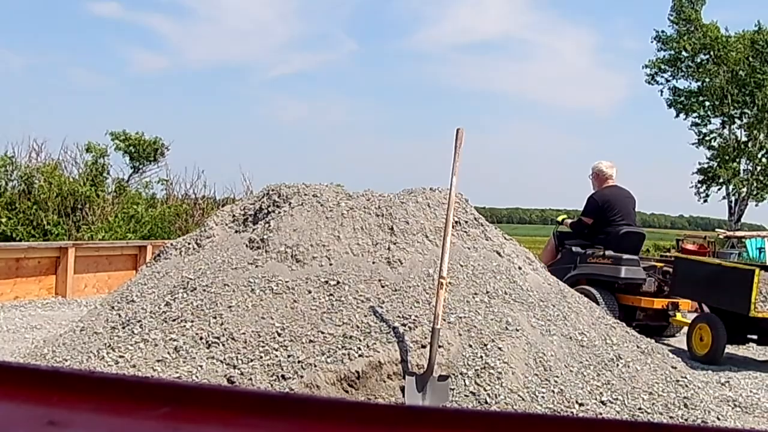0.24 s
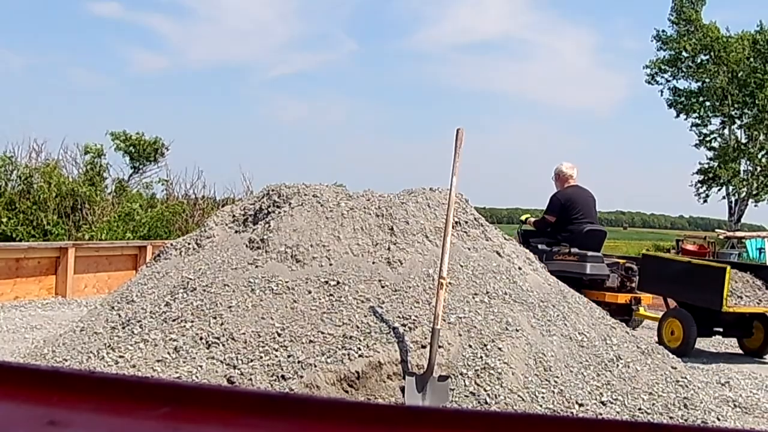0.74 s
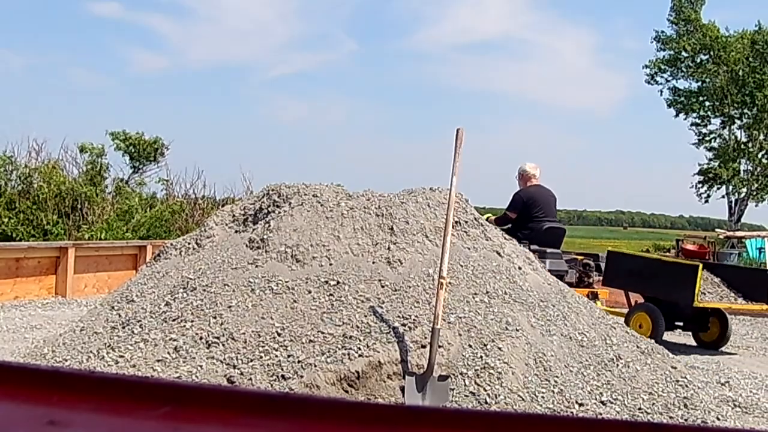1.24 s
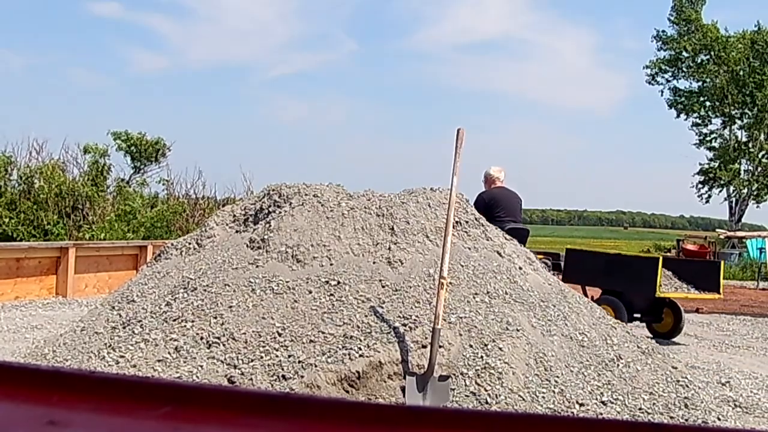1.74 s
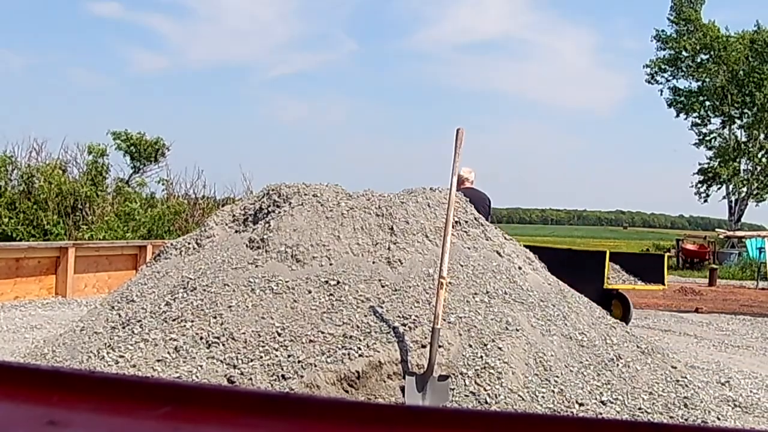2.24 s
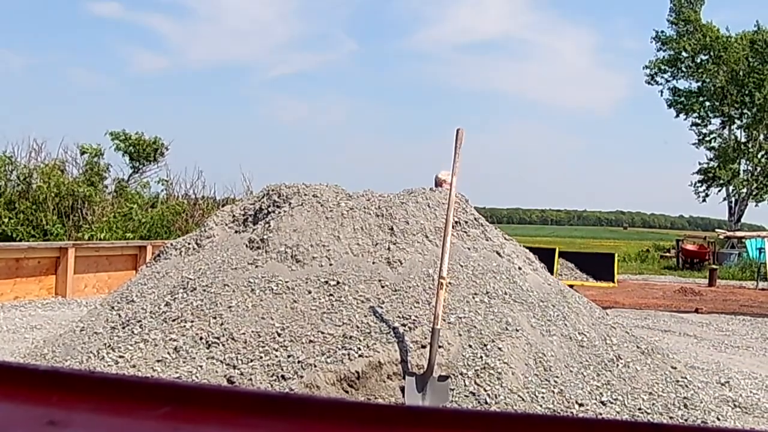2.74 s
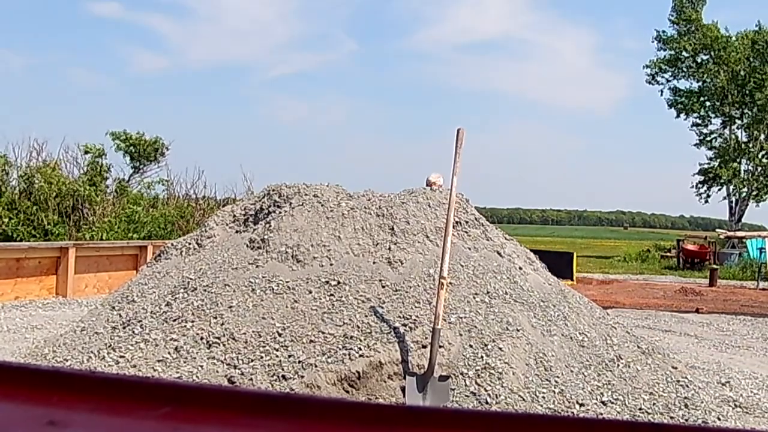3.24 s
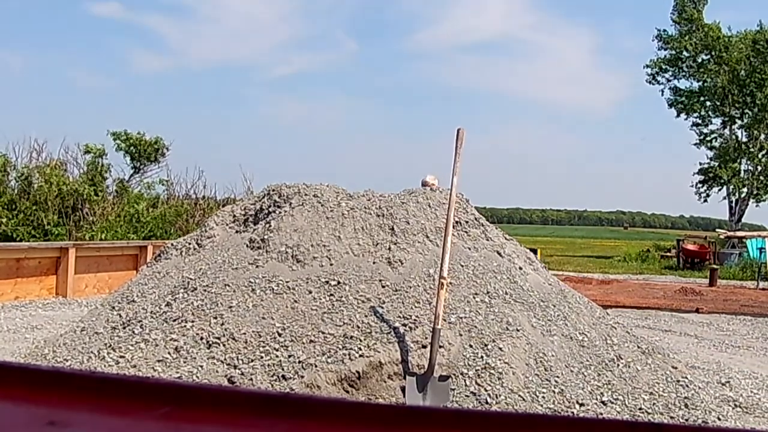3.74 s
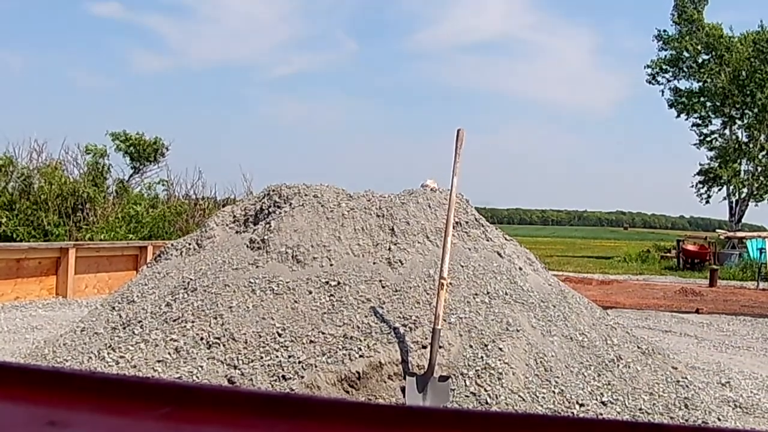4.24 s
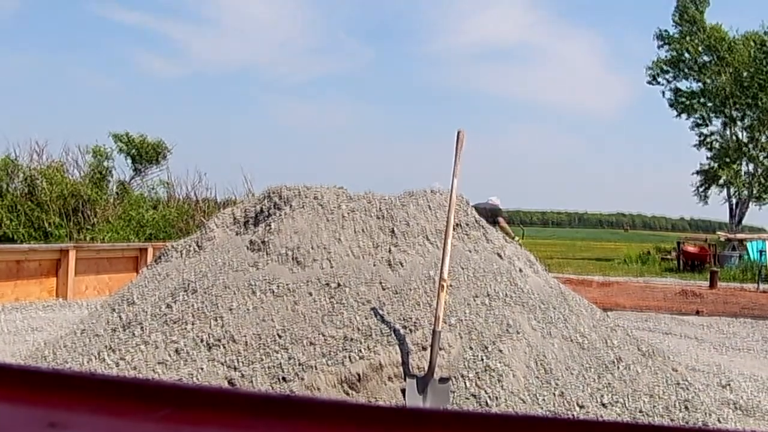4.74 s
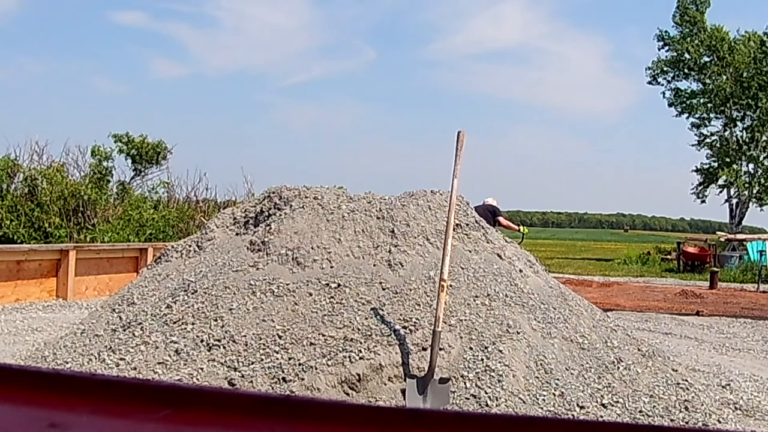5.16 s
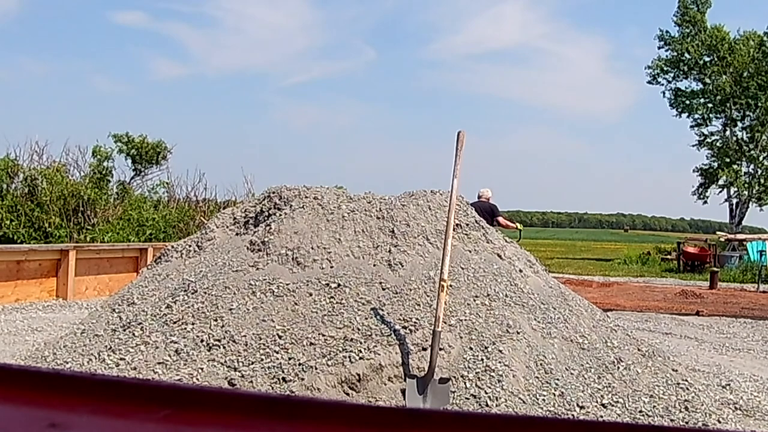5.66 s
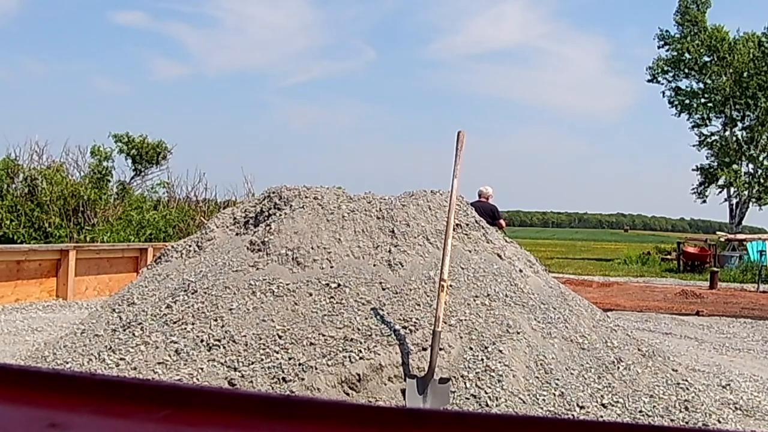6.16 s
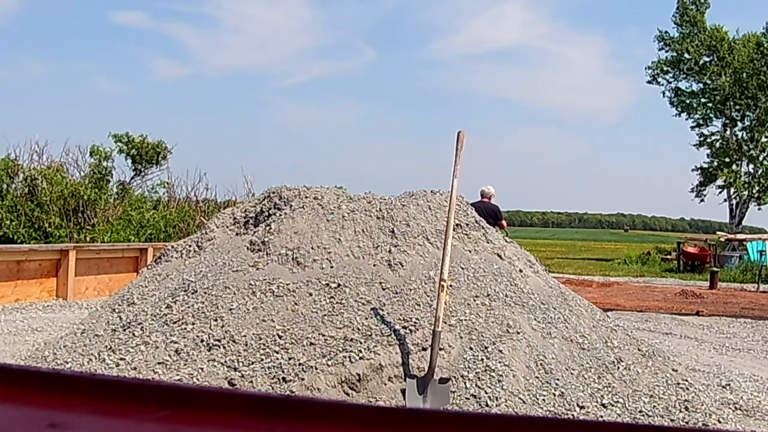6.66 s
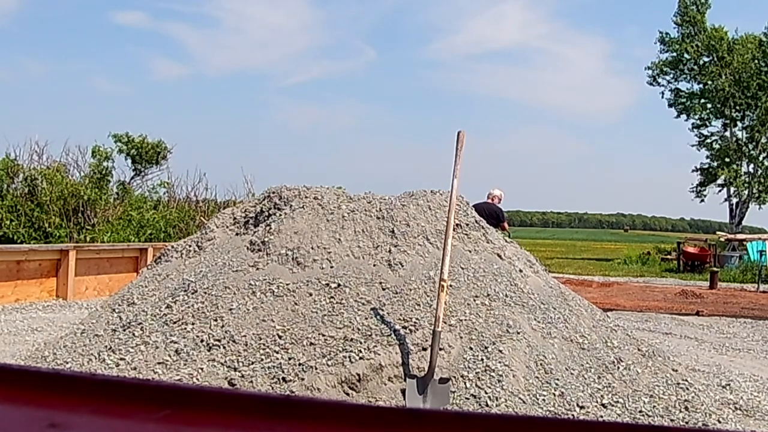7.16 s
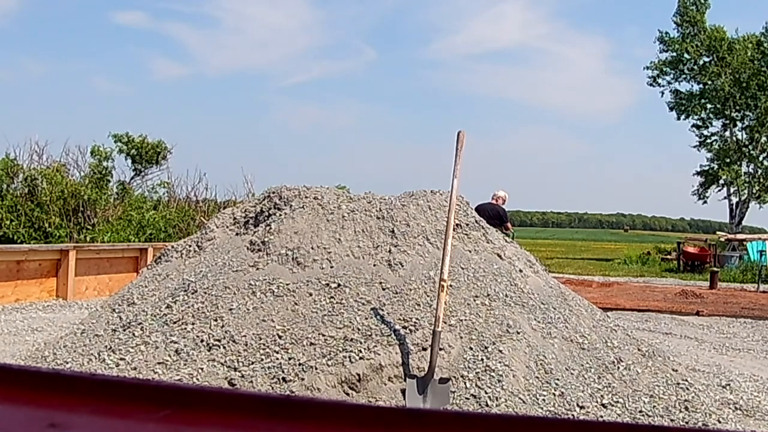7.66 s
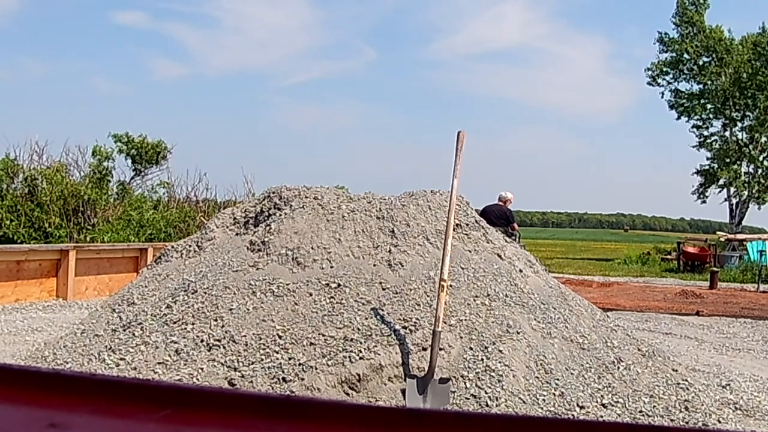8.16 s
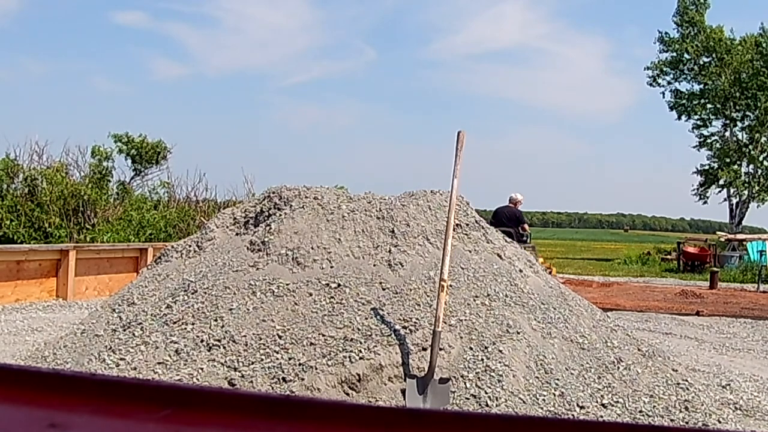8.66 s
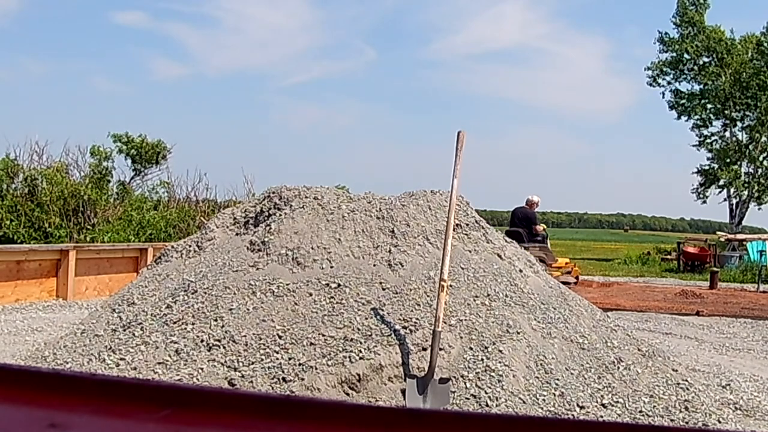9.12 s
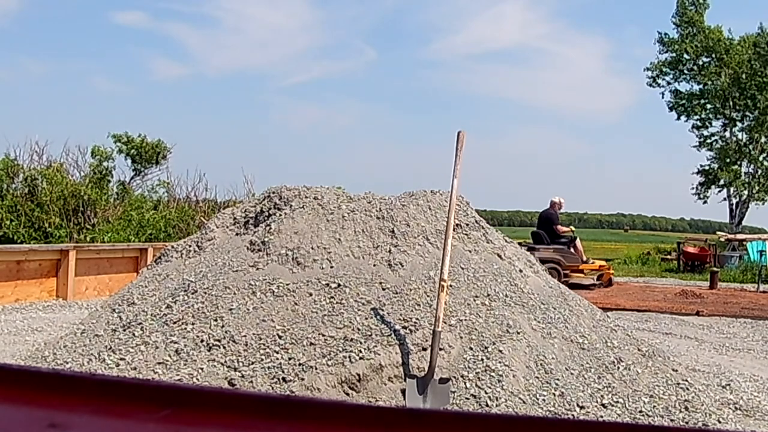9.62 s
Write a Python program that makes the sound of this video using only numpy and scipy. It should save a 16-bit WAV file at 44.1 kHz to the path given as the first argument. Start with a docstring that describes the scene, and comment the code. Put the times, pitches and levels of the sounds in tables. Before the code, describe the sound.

A ride-on mower with an uneven two-cylinder engine throbs near the microphone outdoors, low thumps with bark, clatter and thin mechanical whirr. It becomes duller as it goes behind a gravel heap, wind bumping the microphone. Just before the middle it quickly fades to a farther, clearly quieter chug, hollow and steady, sinking further at the end.

```python
"""A ride-on mower with an uneven-firing two-cylinder engine drives behind a gravel heap, outdoors.
Each firing thumps ringing muffler modes, with a moving echo, and sets off puffs of noise for knock, bark and hiss.
Tones locked to the crank whirr on top; gravel clicks, rolling noise, air hiss and wind rumble lie beneath.
A near pass crossfades into a farther, quieter one. Levels in dB stand ahead of the recorder's gain."""
import sys
import numpy as np
from scipy import signal
from scipy.io import wavfile
from scipy.ndimage import uniform_filter1d

SR = 44100
rng = np.random.default_rng(int(sys.argv[2]) if len(sys.argv) > 2 else 0)


def amplitude_ratio(level_db):
    """Convert a level in decibels to the matching linear amplitude (field) ratio."""
    exponent = np.asarray(level_db, float) / 20
    return 10 ** exponent


def inscribe(sig):
    """Save sig as 16-bit PCM at rate SR to the path in sys.argv[1].

    A 1-D sig is mono; a 2-D sig holds one channel per row.
    Samples are clipped to [-1, 1] before scaling.
    """
    pcm = np.round(np.clip(np.atleast_2d(sig).T, -1, 1) * 32767)
    wavfile.write(sys.argv[1], SR, pcm.astype(np.int16))


N = 436149
TIME = np.arange(N) / SR  # seconds


def rms_one(x):
    """Scale to rms 1."""
    return x / np.sqrt(np.mean(x ** 2) + 1e-20)


def evened(x):
    """Scale to rms 1 over every few engine cycles."""
    power = uniform_filter1d(uniform_filter1d(x ** 2, size=SR // 4), size=SR // 4)
    return x / np.sqrt(power + 1e-20)


def in_time(rows, s):
    """The columns of a table read at times s."""
    times, *columns = np.transpose(rows)
    return [np.interp(s, times, c) for c in columns]


def near_to_far(s, near, far):
    """A setting at times s that glides from its near to its far value during the crossfade."""
    return np.interp(s, (4.6, 5.0), (near, far))


def turning_away(db):
    """Gain that sinks by db as the muffler swings behind the engine."""
    return amplitude_ratio(np.interp(TIME, (6.45, 9.3), (0, db)))


def clicks(s, size):
    """Impulses at times s."""
    at = np.round(s * SR).astype(int)
    heard = (at >= 0) & (at < N)
    return np.bincount(at[heard], size[heard], N) + 1e-18


def ring(x, hz, t60):
    """Damped resonator: a unit click sets a sine of height 1 ringing."""
    r, w = amplitude_ratio(-60 / (t60 * SR)), 2 * np.pi * hz / SR
    return signal.lfilter([0, np.sin(w)], [1, -2 * r * np.cos(w), r * r], x)


def band(x, low_hz, high_hz, order=2):
    """Band-pass."""
    return signal.sosfilt(signal.butter(order, [low_hz, high_hz], "band", fs=SR, output="sos"), x)


def drift(rate_hz):
    """Slow chance of spread 1: low-passed noise drawn at every 40th sample."""
    r = np.exp(-80 * np.pi * rate_hz / SR)
    slow = signal.lfilter([1], [1, -2 * r, r * r], rng.standard_normal(N // 40 + 2002))[2000:]
    return np.interp(np.arange(N) / 40, np.arange(len(slow)), rms_one(slow))


def nearest(when, strength, s):
    """Index of the firing nearest to s, passing over those of the faded pass."""
    return np.argmin(abs(when - s) + (strength < .5))


# Where the mower is, as heard from the microphone. Each row: time in seconds, exhaust level in dB,
# share in the open (0-1), engine side toward us (0-1), tail pipe toward us (0-1).
MOWER_PATH = [(0, -22.5, 0.91, 0.93, 0.84), (.7, -23.5, 1, 0.84, 0.69), (1.44, -25, 0.99, 0.63, 0.2),
              (1.8, -25, 0.93, 0.54, 0.85), (2.3, -25, 0.43, 0.67, 0.86), (2.6, -26.5, 0.23, 0.68, 0.6),
              (2.9, -27, 0.45, 1, 0.12), (3.24, -24.5, 0.43, 1, 0.63), (3.6, -22.5, 0.24, 1, 0.77),
              (4.3, -24.5, 0, 0.72, 0.76), (4.6, -26, 0.02, 0.62, 0.82), (5.0, -34.5, 0.18, 0.33, 0.5),
              (5.6, -33.5, 0.29, 0.44, 0), (7.6, -34, 0.14, 0.52, 0), (8.6, -35, 0.12, 0.23, 0.75),
              (9.1, -34.5, 0.33, 0.5, 0.55), (9.6, -37.5, 0, 0.27, 0.1), (9.89, -39.5, 0.56, 0.26, 0.24)]


def mower_at(s):
    """Exhaust level in dB, openness, engine side and tail pipe at times s."""
    return in_time(MOWER_PATH, s)


# Engine speed under the governor, close by and farther off.
# Each row: time in seconds, speed in cycles per second; each cycle fires both cylinders.
NEAR_ENGINE_SPEED = [(0.0, 18.036), (0.2, 18.475), (0.7, 18.298), (1.05, 18.655), (1.45, 17.5),
                     (1.6, 17.601), (2.0, 19.222), (2.7, 18.019), (2.8, 17.605), (3.1, 17.732),
                     (3.5, 18.69), (4.0, 18.602), (4.3, 18.04), (4.85, 17.887), (5.0, 18.655)]
FAR_ENGINE_SPEED = [(4.4, 17.989), (5.15, 18.091), (5.35, 17.722), (6.1, 18.448), (6.4, 18.069),
                    (8.05, 17.76), (8.3, 18.95), (8.45, 18.579), (8.6, 17.958), (8.95, 17.071),
                    (9.35, 19.073), (9.9, 18.981)]


def crank():
    """For the near and the far pass: times, and the cycles turned by then (the integral of speed)."""
    passes = []
    for speed, start_cycle in ((NEAR_ENGINE_SPEED, .267), (FAR_ENGINE_SPEED, .954)):
        s = np.arange(speed[0][0], speed[-1][0], 1 / 1000)
        passes.append((s, start_cycle + np.cumsum(in_time(speed, s)[0]) / 1000))
    return passes


# Weak firings. Each row: time in seconds, change of strength in dB.
WEAK_FIRINGS = [(2.82, -14.5), (4.465, -5), (5.23, -6.5), (5.31, -5.5), (6.01, -2.5), (6.228, -1.5),
                (6.559, -1.5), (6.892, -2.5), (7.731, -1), (7.843, -1)]


def firings():
    """Times, cylinder (0 or 1) and strength of all firings; the cylinders are unevenly spaced."""
    second_cylinder = .375  # part of a cycle after the first
    rows = []
    for is_far, (s, cycles) in enumerate(crank()):
        for second in (0, 1):
            due = np.arange(int(cycles[-1]) + 1 - second) + second * second_cylinder
            when = np.interp(due, cycles, s, s[0] - 1)
            share = near_to_far(when, 1 - is_far, is_far)
            rows += list(zip(when, np.full(len(due), second), np.sqrt(share)))
    when, second, strength = np.transpose(rows)
    for s, weak_db in WEAK_FIRINGS:
        strength[nearest(when, strength, s)] *= amplitude_ratio(weak_db)
    return when, second, strength


def air():
    """Broad hiss: white noise whose level flickers."""
    return amplitude_ratio(near_to_far(TIME, -75, -83)) * rng.standard_normal(N) * amplitude_ratio(2.5 * drift(9))


# Gusts on the microphone port. Each row: time of the peak in seconds, peak level in dB.
WIND_GUSTS = [(.37, -37), (.71, -52), (1.18, -61), (1.479, -37.5), (1.79, -52), (2.079, -37), (2.6, -33),
              (2.75, -35), (2.93, -43), (3.451, -63), (3.58, -46), (3.97, -42), (4.1, -57.5), (4.381, -50),
              (4.7, -44), (5.32, -47)]


def wind():
    """Lumpy low rumble on the microphone port: a breeze with short bell-shaped gusts."""
    gust_s = 0.065  # spread of a gust
    gusts = sum(amplitude_ratio(db) * np.exp(-((TIME - at) / gust_s) ** 2 / 2) for at, db in WIND_GUSTS)
    rumble = band(rng.standard_normal(N), 24, 150)
    breeze = amplitude_ratio(near_to_far(TIME, -48, -55))
    return (breeze + gusts) * rms_one(rumble * amplitude_ratio(1.4 * drift(12.0)))


# Driving off again at a distance. Each row: time in seconds, level of the wash in dB.
DRIVING_OFF = [(8.5, -85), (9.0, -83.5), (9.4, -66), (9.89, -76)]


def rolling():
    """Driving off: a smooth noise wash of tyres and drive with one deck resonance in it."""
    noise = rng.standard_normal(N)
    wash = rms_one(band(noise, 560, 1700))
    deck = amplitude_ratio(-4) * rms_one(ring(noise, 1255, .05))
    return amplitude_ratio(in_time(DRIVING_OFF, TIME)[0]) * (wash + deck)


def gravel_roar():
    """Dense clicks of stones shifting under the tyres fill the gaps; the heap hides them far off."""
    stones_per_s, spread_db = 1500, 3.5
    sizes = amplitude_ratio(spread_db * np.minimum(rng.exponential(1, N), 5)) * rng.choice([-1, 1], N)
    stones = sizes * (rng.random(N) < stones_per_s / SR)
    crunch = evened(band(stones, 650, 1005)) * amplitude_ratio(2.0 * drift(6.0))
    return amplitude_ratio(near_to_far(TIME, 0, -7)) * crunch


# Shake, fan and pump tones. Each row: turns per engine cycle, level in dB to the exhaust level,
# dB gained in the open, dB gained far off.
WHIRR_TONES = [("2", -29.5, 1.9, -7.5), ("15", -28, 3.2, 3.8), ("16", -31, 0.99, -3), ("17", -34, 1.5, -6),
               ("18", -32.5, 2.3, 10.3), ("20", -32, 0.81, -18), ("21", -42, 1.1, -2.7),
               ("22", -27, -9.5, 4.7), ("23", -41, 13, 0.6), ("26", -37, 5.1, -1), ("28", -46.5, 1.1, 1.1),
               ("29", -41.5, 0.56, 15.1), ("32", -38.5, 2.4, 1.1), ("38", -45, 2.1, 1.4)]
# A tone swells for a while as a panel picks it up, or sinks where the dB are negative.
# Each row: time of the middle in seconds, half length (to 1/e) in seconds, tone per engine cycle, change in dB.
TONE_SWELLS = [(0.41, 0.74, "29", 15), (0.78, 0.46, "20", 6), (0.971, 0.56, "18", 0.5),
               (2.145, 0.12, "20", 12), (2.162, .21, "26", 11), (3.067, 0.21, "29", 17.4),
               (3.216, 0.28, "23", 13.5), (3.314, 0.26, "21", 11), (3.32, .39, "26", 2),
               (3.405, 1.1, "20", 6), (3.93, 0.18, "32", 20), (3.96, 0.24, "18", -3.5),
               (3.98, 0.36, "16", 13.5), (3.99, .45, "17", 11), (0.3, .5, "15", 6), (3.898, .4, "38", 10.5),
               (4.862, 0.47, "22", 5), (7.908, 1.9, "22", 2.4), (8.155, 0.15, "21", 8.1),
               (8.316, 0.27, "22", -10), (8.34, 0.079, "29", -9), (8.36, 0.16, "32", 11),
               (8.368, .11, "26", 14), (9.105, 0.99, "18", -23), (9.12, 0.43, "15", -9.5),
               (9.21, 0.23, "32", 7.1), (9.558, 0.26, "28", 13), (9.614, 0.3, "29", -11.1),
               (9.62, 0.44, "26", 16), (9.63, 0.3, "22", -13)]


def whirr():
    """Sines locked to the crank, wavering in level and throbbing once a cycle."""
    throb_depth, throb_peak = .25, .2  # peak as part of the cycle
    far = near_to_far(TIME, 0, 1)
    level_db, in_open = mower_at(TIME)[:2]
    near_cycles, far_cycles = (np.interp(TIME, s, cycles) for s, cycles in crank())
    out = 0
    for order, db, open_db, far_db in WHIRR_TONES:
        near_tone = np.sin(2 * np.pi * int(order) * near_cycles)
        far_tone = np.sin(2 * np.pi * int(order) * far_cycles)
        tone = (1 - far) * near_tone + far * far_tone
        swell_db = sum(lift * np.exp(-((TIME - at) / length) ** 2)
                       for at, length, which, lift in TONE_SWELLS if which == order)
        tone_db = level_db + db + open_db * in_open + far_db * far + swell_db + 1.8 * drift(4.0)
        out = out + np.sqrt(2) * tone * amplitude_ratio(tone_db)
    cycles = np.where(far < .5, near_cycles, far_cycles)
    return out * (1 + throb_depth * np.cos(2 * np.pi * (cycles - throb_peak)))


# Engine shroud and deck resonances.
# Each row: frequency in Hz, nominal width in Hz, level in dB against the other modes of its band.
BODY_MODES = [(751.5, 36, 6.5), (915, 63, -1), (1253, 13, -5), (1464, 160, 0.5), (1625, 150, -1),
              (2042, 41, -7), (2197, 120, -5), (2420, 160, -4), (2712, 57, -11), (3917, 200, -2.5),
              (4260, 320, -0.5), (4520, 210, -6), (5580, 530, 4), (6110, 150, -8), (6340, 300, -4.5),
              (6790, 89, -5.5), (9100, 110, -24), (9700, 58, -11), (9900, 92, -4), (10600, 94, -13)]


def puffs(when, size, edges_hz, t60, steady_db, crack_db, broad_db, vary_db):
    """A crack and a dying gas puff per firing over steady rattle excite each body mode, plus a broad part."""
    fade, noise = amplitude_ratio(-60 / (t60 * SR)), rng.standard_normal(N)
    scale = np.sqrt(SR / 36 * (1 - fade ** 2))  # puffs of about unit power

    def gas(sizes):
        """Excitation for one set of firing strengths."""
        gate = clicks(when, sizes)
        swell = scale * signal.lfilter([1], [1, -fade], gate)
        rattle = amplitude_ratio(steady_db + 3.0 * drift(15))
        return (swell + rattle) * noise + amplitude_ratio(crack_db + 30) * gate

    out = amplitude_ratio(broad_db) * rms_one(band(gas(size), *edges_hz))
    for hz, width_hz, db in BODY_MODES:
        if edges_hz[0] < hz < edges_hz[1]:
            struck = gas(size * amplitude_ratio(vary_db * rng.standard_normal(len(when))))  # each mode hit anew
            mode = ring(struck, hz, 2.6 / width_hz)
            out += amplitude_ratio(db) * rms_one(band(mode, *edges_hz, order=1))
    return evened(out)


def hisses(when, second, strength):
    """Low clatter, high clatter and sizzle: treble puffs, later when they come round the heap."""
    lag_ms = np.interp(mower_at(when)[1], (.5, 1), (6.5, 0.51))  # hidden, in the open
    second_db = near_to_far(when, -14.5, 1)
    hissed = when + lag_ms / 1000 - .0015
    size = strength * amplitude_ratio(2.4 * rng.standard_normal(len(when)) + second_db * second)
    return (puffs(hissed, size, (3400, 4800), 0.04, -9.5, -15.0, -24.0, 6.0),
            puffs(hissed, size, (4900, 7600), 0.028, -8.0, -16.0, -16.0, 7.0),
            puffs(hissed, size, (8300, 11200), .025, -5.0, -16.0, -3.0, 5.0))


# The singled-out sharp firings. Each row: time in seconds, sharpness in dB to a usual full-strength firing.
SHARP_FIRINGS = [(.419, 0), (.583, -1), (.962, 1), (.984, 6.5), (1.016, 8), (1.124, 2.5), (1.234, 1.5),
                 (1.401, 7), (1.515, 7), (1.572, 4.5), (1.629, 6.5), (1.741, 7.5), (1.816, 4), (2.762, 5.5),
                 (3.378, 1), (4.078, -3), (4.9, 11.5), (5.122, 7.5), (5.178, 6.5), (5.401, 2), (5.569, 1.5),
                 (5.625, 7), (5.681, 2), (5.735, -2), (5.846, 3.5), (6.064, 9), (6.174, -3), (6.283, -2.5),
                 (6.393, 1.5), (6.504, 7.5), (6.781, 5), (6.836, 6), (7.059, 0.5), (7.171, 0), (7.785, 7),
                 (7.898, 5), (8.011, 5.5)]


def sharpness(when, second, strength):
    """How sharply each firing cracks; the second cylinder is softer."""
    second_db = near_to_far(when, -5, -4.5)
    sharp = strength * amplitude_ratio(1.8 * rng.standard_normal(len(when)) + second_db * second)
    for s, sharp_db in SHARP_FIRINGS:
        sharp[nearest(when, strength, s)] = amplitude_ratio(sharp_db)
    return sharp


def barks(when, second, sharp):
    """Bark and upper bark; the heap delays the first cylinder's far bark and evens out the firings."""
    shadowed = near_to_far(when, 0, 1)
    muffled = sharp ** (1 - .45 * shadowed) * amplitude_ratio(-4.5 * shadowed)
    round_heap_ms = 5.0
    barked = when - .0014 + shadowed * (1 - second) * round_heap_ms / 1000
    return (puffs(barked, muffled, (1000, 1800), 0.04, -4.0, -7.0, -8.5, 3.5),
            puffs(barked, muffled, (1850, 3000), .035, -11.0, -6.0, -3.5, 3.5))


def knock(when, second, sharp):
    """A soft, hollow knock just after each thud sets in, with a bounce in the tail pipe; it carries round the
    heap."""
    lead_ms, bounce_ms = near_to_far(when, 2.4, 1.5), 6.0
    popped = when - lead_ms / 1000 + .001 * second
    size = sharp * amplitude_ratio(near_to_far(when, -3.5, -0.5) * second)
    bounce = near_to_far(when, 0.21, 0.75) * size
    times, sizes = np.r_[popped, popped + bounce_ms / 1000], np.r_[size, bounce]
    steady_db = near_to_far(TIME, -3.5, -17.5)
    pop = puffs(times, sizes, (560, 1000), .014, steady_db, 9.0, -8.0, 1.2)
    return amplitude_ratio(near_to_far(TIME, 0, 6.5)) * turning_away(-3) * evened(band(pop, 420, 1000, order=3))


# Strokes that boom in the muffler shell. Each row: time in seconds, strike in dB to the exhaust level.
SHELL_BOOMS = [(.48, -12), (1.25, -14), (2.35, -20), (2.85, -3), (4.48, 3.5), (5.1, -10), (5.33, -6),
               (5.62, 0), (6.0, -5), (6.3, -10), (6.9, -3), (7.78, -1)]


def booms(when, strength):
    """The shell rings a little, with either sign, at every stroke and by a set amount at a few."""
    size = strength * amplitude_ratio(-16) * rng.standard_normal(len(when))
    for s, db in SHELL_BOOMS:
        size[nearest(when, strength, s)] = amplitude_ratio(db)
    return band(ring(clicks(when, size), 250, .07), 180, 300)


# Higher muffler modes. Each row: frequency in Hz, t60 in seconds, strength in dB against each other.
DRONE_MODES = [(336, 0.097, 3.5), (415.6, 0.03, 3.5), (508.4, 0.058, -5), (510, 0.0075, -20),
               (594.8, 0.16, -3)]


def drone(start, size):
    """Higher muffler modes that speak after the thump, with a rush of gas after each stroke."""
    lag_ms, rush_t60_s = 7.933, .12
    push = clicks(start + lag_ms / 1000, size)
    tones = sum(amplitude_ratio(db) * ring(push, hz, t60) * (-1) ** k for k, (hz, t60, db) in enumerate(DRONE_MODES))
    outflow = signal.lfilter([1], [1, -amplitude_ratio(-60 / (rush_t60_s * SR))], clicks(start, size)) + amplitude_ratio(-11)
    rush = evened(band(outflow * rng.standard_normal(N), 330, 701)) * amplitude_ratio(near_to_far(TIME, -8, -11))
    both = evened(evened(band(tones, 280.6, 610, order=3)) + rush)
    return amplitude_ratio(near_to_far(TIME, 0, -1)) * np.sqrt(turning_away(-9.5)) * both


# Upper muffler modes. Each row: frequency in Hz, t60 in seconds, strength in dB against each other.
GROWL_MODES = [(256, 0.12, 1.5), (300.5, 0.07, 3)]


def growl(push):
    """Upper muffler modes that speak after the thump and sink as the mower turns away."""
    lag_ms = 3.878
    smoothed = signal.lfilter(np.ones(8) / 8, [1], push)
    late = np.interp(np.arange(N) - lag_ms / 1000 * SR, np.arange(N), smoothed)
    tones = sum(amplitude_ratio(db) * ring(late, hz, t60) for hz, t60, db in GROWL_MODES)
    return amplitude_ratio(near_to_far(TIME, 0, -1.5)) * turning_away(-9.5) * evened(band(tones, 204.0, 348.4, order=3))


# Muffler thump. Each row: frequency in Hz, t60 in seconds, signed strength.
THUD_MODES = [(93, .069, -.19), (187, .019, 1.49), (205, .021, -1.14)]
# Pipe resonances, low and upper. Each row: frequency in Hz, t60 in seconds.
PIPE_MODES = [(95, 0.092), (192, 0.13)]


def thuds(push, when, start, size):
    """The muffler thump with the pipe ringing after it; the small microphone loses the lowest orders."""
    _, in_open, _, pipe = mower_at(when)
    low_db = -15.5 + 29.5 * in_open
    upper_db = -18.5 + 34 * pipe
    out = sum(gain * ring(push, hz, t60) for hz, t60, gain in THUD_MODES)
    for (hz, t60), ring_db in zip(PIPE_MODES, (low_db, upper_db)):
        out -= ring(clicks(start + 0.0042, size * amplitude_ratio(ring_db - 25.5)), hz, t60)
    return evened(signal.sosfiltfilt(signal.butter(3, [70, 300], "band", fs=SR, output="sos"), out))


# The nearby surface that returns the exhaust. Each row: time in seconds, echo delay in ms, echo share.
EXHAUST_ECHO = [(0, 8.7, 0.99), (1.0, 9.26, 0.92), (1.4, 8.94, 0.35), (1.8, 9.4, 1), (2.2, 9.5, 1),
                (2.6, 9.25, 0.34), (3.05, 12.7, 0.59), (3.4, 10.7, 0.13), (3.8, 10.3, 0.37),
                (4.75, 10.26, 0.42), (5.05, 9.6, 0.3), (7.7, 9.4, 0.3), (8.3, 8.84, 0.5), (8.9, 8.67, 1),
                (9.4, 8.5, 1), (9.89, 8, 0.33)]


def exhaust(when, second, strength):
    """Thud, growl and drone: each stroke pushes the muffler; a surface returns thud and growl a few ms late."""
    echo_ms, echo_share = in_time(EXHAUST_ECHO, when)
    chance = rng.standard_normal((len(when), 3))
    size = strength * amplitude_ratio(-2.4 * second + 0.8 * chance[:, 0])
    start = when - .00275 + .00008 * chance[:, 1]
    echo = clicks(start + echo_ms / 1000, size * echo_share * amplitude_ratio(1.2 * chance[:, 2]))
    push = clicks(start, size) + echo
    return thuds(push, when, start, size), growl(push), drone(start, size)


def engine(when, second, strength):
    """All parts of the mower that follow the exhaust level, weighed by how it stands to the microphone."""
    sharp = sharpness(when, second, strength)
    layers = (*exhaust(when, second, strength), knock(when, second, sharp), *barks(when, second, sharp),
              *hisses(when, second, strength), gravel_roar())
    # dB to the exhaust level, dB gained in the open, with engine side toward us, with tail pipe toward us
    mixes = ((0, 0, 0, 0),               # thud
             (-11, -0.5, -2.5, -1),      # growl
             (-14.5, -0.5, -3.8, -3.5),  # drone
             (-27.5, 3.5, -1.7, -3.5),   # knock
             (-34.5, 11, 0.5, -0.5),     # bark
             (-51, 16.5, 6, 1.1),        # upper bark
             (-48.5, 9.5, 5.5, 0.7),     # low clatter
             (-53.5, 1.5, 17, 0.5),      # high clatter
             (-69.5, 17.5, 9.5, -3.5),   # sizzle
             (-34, 7, 1, 0.8))           # gravel roar
    level_db, in_open, side, pipe = mower_at(TIME)
    out = booms(when, strength)
    for (db, open_db, side_db, pipe_db), layer in zip(mixes, layers):
        out = out + amplitude_ratio(db + open_db * in_open + side_db * side + pipe_db * pipe) * layer
    return amplitude_ratio(level_db) * out


def scene():
    """Air, wind, rolling and whirr around the engine, as one channel."""
    return (air() + wind() + rolling() + whirr() + engine(*firings()))[None]


def low_pass(x):
    """Removes everything above the highest recorded frequency."""
    return signal.sosfilt(signal.butter(12, 15700, fs=SR, output="sos"), x)


def record(dry):
    """The recorder's gain, with softly rounded peaks."""
    mix = 0.2 * np.tanh(dry / 0.24)
    return low_pass(mix)


dry = scene()
out = record(dry)
inscribe(out)
```